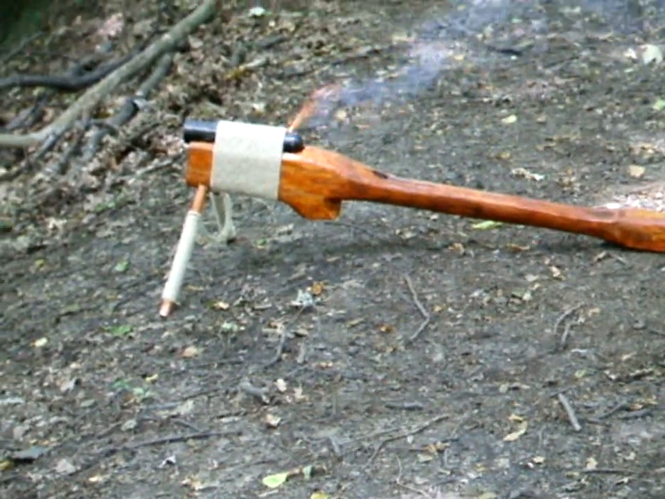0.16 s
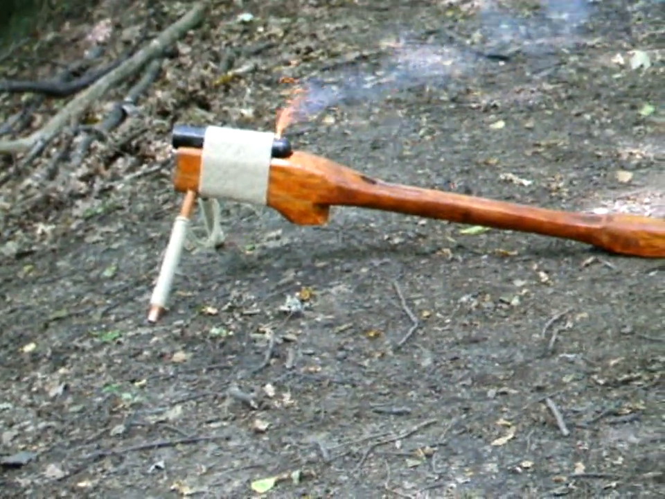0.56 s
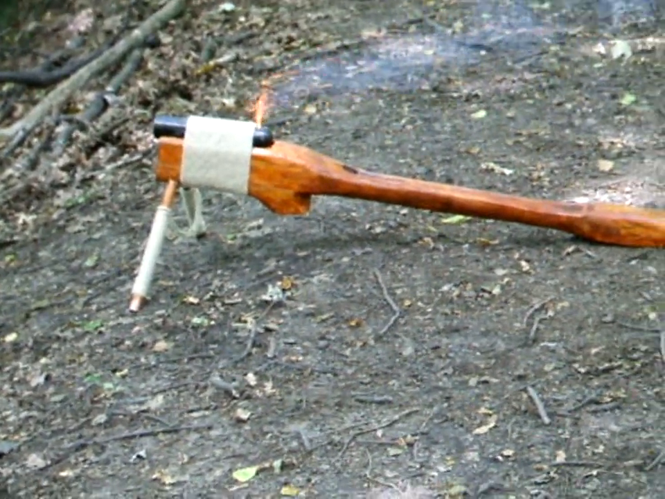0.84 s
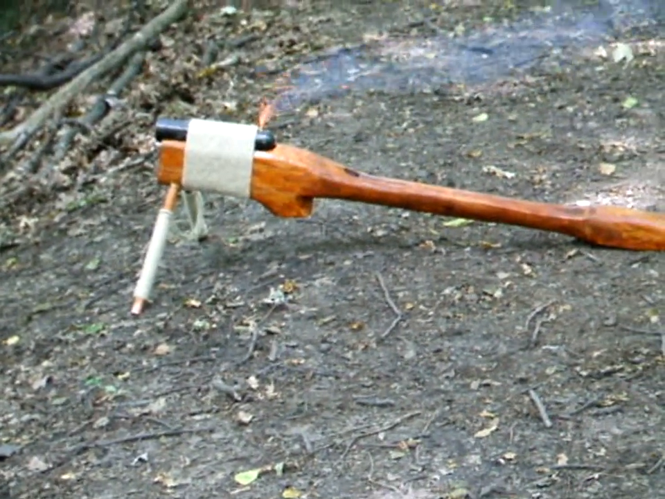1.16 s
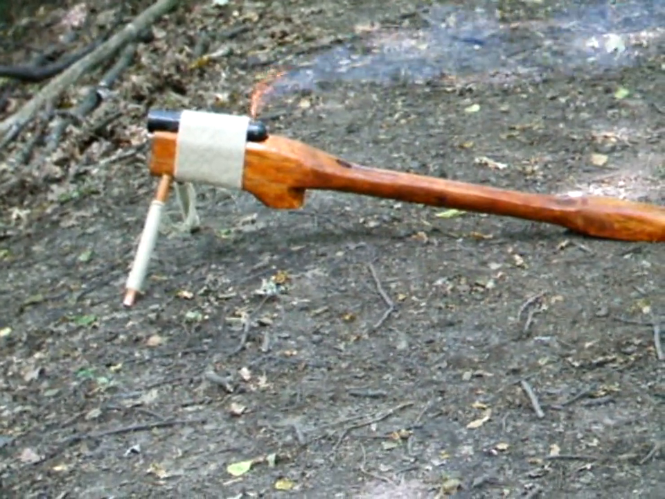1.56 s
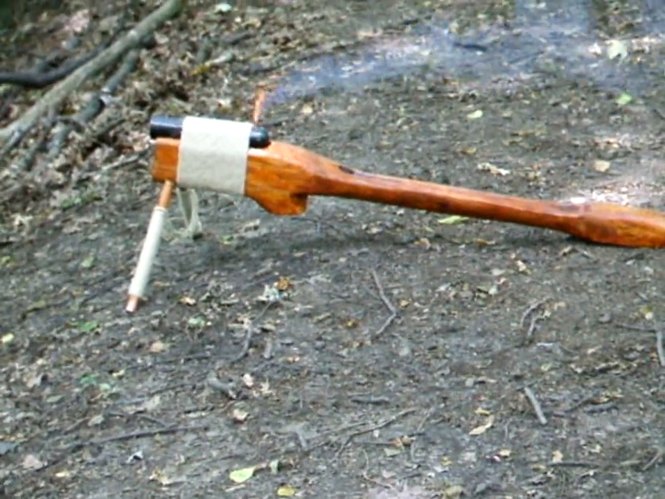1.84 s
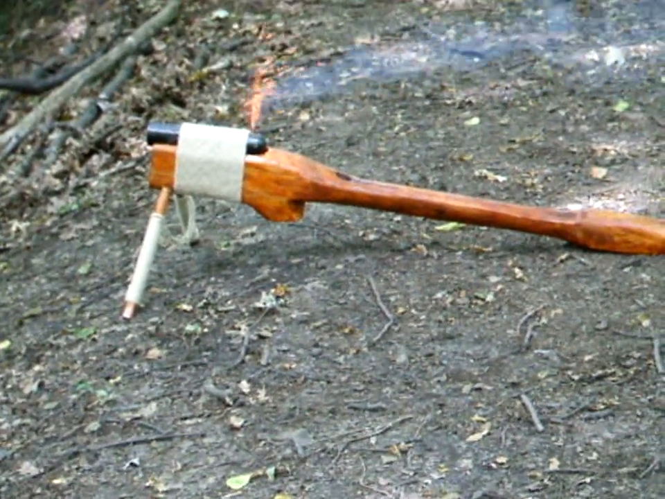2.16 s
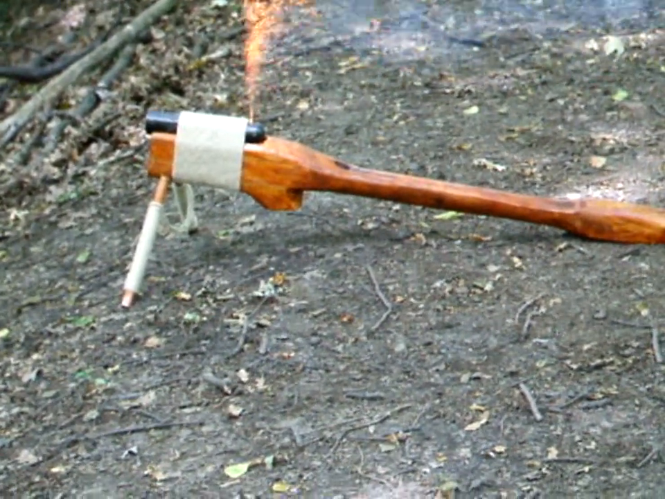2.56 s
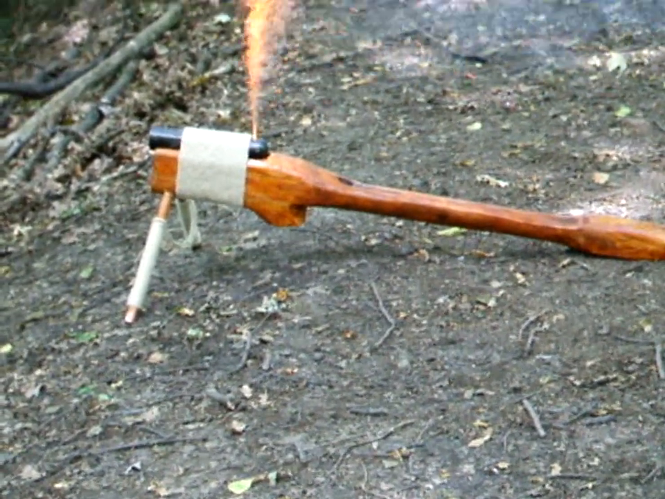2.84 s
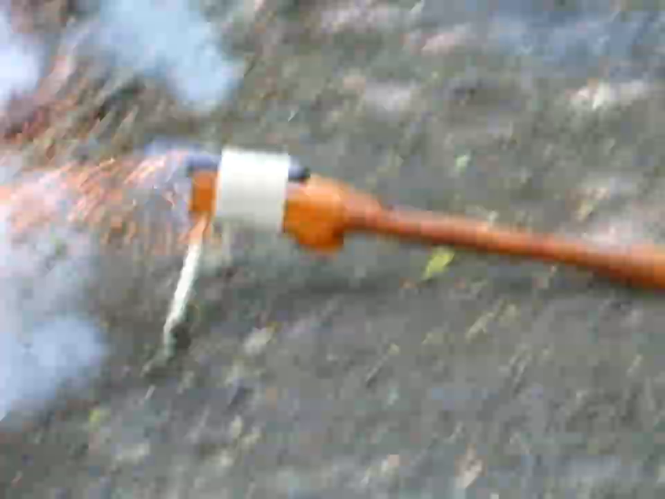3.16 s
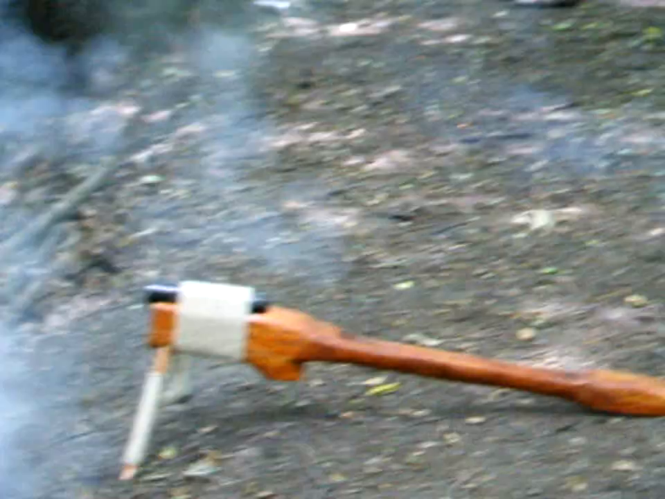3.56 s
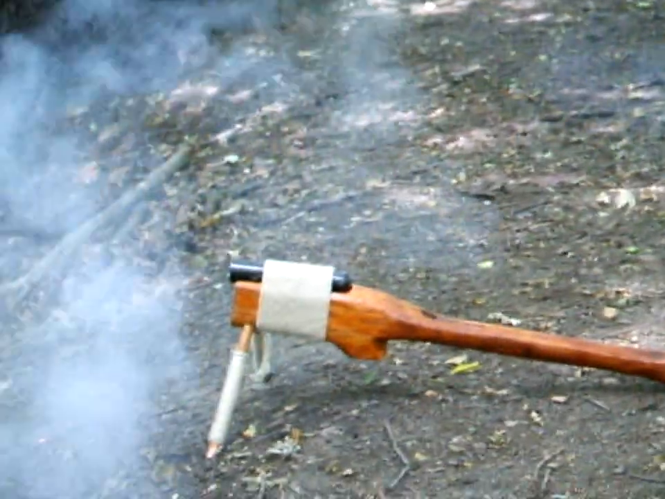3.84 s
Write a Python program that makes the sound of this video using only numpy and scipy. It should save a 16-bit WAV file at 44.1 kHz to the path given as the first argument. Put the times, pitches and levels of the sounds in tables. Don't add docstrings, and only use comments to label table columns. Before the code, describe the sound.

A small cannon's fuse fizzes thinly and unevenly over soft forest air. At 0.6-1.1 s leaves crunch and twigs snap, the sharpest near 1.03 s, with faint bird chirps until 1.8 s. From 2.4 s the hiss surges into a sputtering, roaring jet. At 3.23 s a hard-clipped blast cuts it off; a low boom dies, the level dips, then the noisy tree echo swells and dulls until 4 s.

```python
import sys
import numpy as np
from scipy import signal
from scipy.fft import rfft, irfft
from scipy.io import wavfile
from scipy.ndimage import uniform_filter1d

SR = 44100
rng = np.random.default_rng(int(sys.argv[2]) if len(sys.argv) > 2 else 0)


def volts(x):
    e = np.asarray(x, float) / 20
    return 10 ** e


def dump(signal):
    limited = np.clip(np.atleast_2d(signal).T, -1, 1)
    pcm = np.round(limited * 32767).astype(np.int16)
    wavfile.write(sys.argv[1], SR, pcm)


N = 176400
T = np.arange(N) / SR
SHOT_S = 3.2252
QUIET_DB = -36.5

# (time [s], level [dB])
BURN_LEVEL = [(0.0, -33), (0.25, -36.5), (0.27, -29.5), (0.65, -33), (0.96, -31), (1.03, -27.5),
              (1.09, -34.5), (2.41, -34), (2.66, -25), (2.92, -21), (2.93, -19), (3.04, -19), (3.07, -18.5),
              (3.1, -18.5), (3.12, -17.5), (3.14, -17), (3.19, -18.5), (3.22, -19.5)]
# (frequency [Hz], density [dB per Hz])
JET_COLOUR = [(90, -41), (200, -1.5), (460, -16.5), (640, 5), (950, -2.5), (2060, -1.5), (3400, -3.5),
              (16000, -6.5)]
# (time [s], width [s], boost [dB])
JET_SPURTS = [(.28, 0.04, -1), (.84, 0.042, 2), (2.65, .008, 1), (2.85, 0.019, 4), (2.939, 0.036, 2.5),
              (2.994, 0.0089, 3.5), (3.055, 0.0069, 1.5), (3.075, 0.014, 2), (3.123, 0.0077, 2.5),
              (3.162, 0.0028, 2.5), (3.194, 0.017, 3), (3.084, 0.0022, -4), (3.22, 0.0062, -1.5)]
# (frequency [Hz], density [dB per Hz])
AIR_COLOUR = [(10, -20), (30, 1.5), (60, -9), (250, -5.5), (420, -5.5), (620, -2), (1500, -2.5),
              (3000, -8.5)]
# (time [s], width [s], level [dB], pitch [Hz])
LEAF_CRUNCHES = [
    (.645, .03, -40, 1200),
    (.712, .02, -33, 1000),
    (.745, .02, -36, 800),
    (.88, .06, -44, 700),
    (.985, .03, -36, 1050),
    (1.035, .03, -40, 2500),
    (1.37, .02, -45, 2000),
]
# (time [s], peak [dB], pitch [Hz], decay to -60 dB [s])
TWIG_SNAPS = [
    (.6955, -23, 660, .03),
    (.7045, -24, 3800, .025),
    (.7095, -22, 1220, .04),
    (.7145, -24, 1100, .03),
    (.7352, -15, 780, .022),
    (1.0262, -9, 2050, .009),
    (1.0343, -17, 2300, .006),
    (1.0535, -24, 2900, .012),
    (1.468, -23, 1900, .015),
]
# (time [s], length [s], level [dB], pitch [Hz])
BIRD_CALLS = [
    (.85, .045, -45, 3300),
    (.88, .06, -40, 1060),
    (1.545, .07, -46, 4000),
    (1.74, .07, -47, 1320),
]
# (time [s], level [dB])
ECHO_LEVEL = [(3.23, -11.5), (3.236, -17.5), (3.28, -20), (3.308, -26.5), (3.536, -15), (3.898, -11.5),
              (4.0, -12)]
# (frequency [Hz], density [dB per Hz])
ECHO_START_COLOUR = [(30, -20), (100, 4.5), (300, -10.5), (700, -9), (2000, -11), (4000, -10),
                     (6000, -11.5), (8000, -15.5)]
# (frequency [Hz], fade [dB per s])
ECHO_FADE = [(30, 2), (120, 15.5), (350, -12.5), (1000, -1.5), (3000, 8.5), (6000, 23.5), (8000, 35.5)]
# (time after the shot [s], offset [full scale])
PREAMP_SWING = [(0, 0), (.0025, -.45), (.007, -1.05), (.016, -1.0), (.045, -.5), (.049, .2), (.063, .15),
                (.066, .72), (.08, .75), (.097, .04)]
# (frequency [Hz], gain [dB])
MIC_RESPONSE = [(20, 0), (6500, 0), (7750, -1), (8000, 2)]
# (frequency [Hz], gain [dB])
MIRROR_GAIN = [(8000, 0), (8800, -5.5), (10600, -16), (12300, -28.5), (13500, -47), (14500, -60),
               (16000, -62)]


def evened(x):
    return x / np.sqrt(np.mean(x ** 2) + 1e-20)


def read(points, hz):
    f, value = np.transpose(points)
    return np.interp(np.log(hz + 1), np.log(f + 1), value)


def noise():
    return rng.standard_normal(N)


def band_rms(x, lo_hz, hi_hz):
    z, hz = rfft(x), np.fft.rfftfreq(len(x), 1 / SR)
    band = z[(hz > lo_hz) & (hz < hi_hz)]
    return np.sqrt(2 * np.sum(abs(band) ** 2)) / len(x)


def slow(size):
    return evened(uniform_filter1d(uniform_filter1d(noise(), size), size))


def shaped(x, field, patch_db):
    hz, t, z = signal.stft(x, SR, nperseg=512, noverlap=384)
    patches = uniform_filter1d(rng.standard_normal(z.shape), size=6, axis=0)
    patches = evened(uniform_filter1d(patches, size=16, axis=1))
    gain = volts(field(hz[:, None], t[None]) + patch_db * patches)
    return signal.istft(z * gain, SR, nperseg=512, noverlap=384)[1][:N]


def resonate(x, hz, width):
    turn = np.exp(2j * np.pi * hz * np.arange(len(x)) / SR)
    r = np.exp(-np.pi * width / SR)
    return 2 * (turn * signal.lfilter([1 - r], [1, -r], x / turn)).real


def sparks(per_s, spread_db):
    size = volts(spread_db * np.minimum(rng.exponential(1, N), 4)) * rng.choice([-1., 1.], N)
    return evened(size * (rng.random(N) < per_s / SR))


def path_echo(x):
    delay_s, gain = .00057, .55
    z, hz = rfft(x), np.fft.rfftfreq(N, 1 / SR)
    bounce = gain / (1 + (hz / 9000) ** 2) * np.exp(-2j * np.pi * hz * delay_s)
    return irfft(z * (1 + bounce), N)


def bore_hum(over):
    hz, width_hz = 200, 120
    level_db = -85.5 + 2.5 * uniform_filter1d(over, size=4000)
    return volts(level_db) * evened(resonate(resonate(noise(), hz, width_hz), hz, width_hz))


def fuse():
    spark_share, roar_hz, roar_per_db = .35, 1770, 1.0358
    burn_db = np.interp(T, *np.transpose(BURN_LEVEL))
    spurt_db = sum(db * np.exp(-((T - s) / w) ** 2) for s, w, db in JET_SPURTS)
    over = np.maximum(burn_db - QUIET_DB, 0)
    drive = (1 - spark_share) * noise() + spark_share * sparks(per_s=4000, spread_db=3.0)
    strength = over ** 2 / 20 + spurt_db

    def colour(hz, t):
        roar = roar_per_db * (np.interp(t, T, strength) - 28.5) / (1 + (hz / roar_hz) ** 2)
        return read(JET_COLOUR, hz) + roar

    gas = path_echo(shaped(drive, colour, patch_db=1.5))
    flutter = evened(slow(size=90) + slow(size=400) + .7 * slow(size=1800))
    flicker_db = (1.2 + .025 * over) * flutter
    gas = gas / band_rms(gas, 3280, 8630) * volts(burn_db + spurt_db + flicker_db - 1.0)
    return (gas + bore_hum(over)) * (T < SHOT_S)


def woods():
    z, hz = rfft(noise()), np.fft.rfftfreq(N, 1 / SR)
    air = irfft(z * volts(read(AIR_COLOUR, hz) - 4.35 * np.log2(1 + hz / 2500)), N)
    air = shaped(air, lambda hz, t: 0 * hz * t, patch_db=0.69)
    level_db = -39.5 + 1.9 * np.exp(-((T - .45) / 0.89) ** 2)
    return volts(level_db) * evened(air) * (T < SHOT_S)


def leaves():
    out, grit = np.zeros(N), sparks(per_s=4000, spread_db=1.8)
    for s, w, db, hz in LEAF_CRUNCHES:
        crunch = sum(resonate(resonate(grit, hz * m, hz * 0.52), hz * m, hz * 0.67) for m in (.7, 1.3))
        out += volts(db) * evened(crunch) * np.exp(-((T - s) / w) ** 2)
    return out


def twigs():
    out, t = np.zeros(N), np.arange(2000) / SR
    for s, db, hz, t60 in TWIG_SNAPS:
        ring = np.zeros(len(t))
        for m, gain in [(1, .6), (1.6, .5), (2.4, .5)]:
            ring += gain * np.sin(2 * np.pi * hz * m * t) * volts(-60 * m * t / t60)
        out[round(s * SR):][:len(t)] += volts(db + 3) * ring * np.minimum(t * hz, 1)
    return out


def birds():
    out = np.zeros(N)
    for s, length, db, hz in BIRD_CALLS:
        u = np.clip((T - s) / length, 0, 1)
        out += volts(db) * np.sin(np.pi * u) * np.sin(2 * np.pi * hz * (T + 0.011 * length * u ** 2))
    return out


def crack(u):
    hz, width_hz, level_db, t60 = 2200, 3000, -9, .035
    burst = evened(resonate(resonate(noise(), hz, width_hz), hz, width_hz))
    return volts(level_db - 60 * u / t60) * np.minimum(u / .0008, 1) * burst


def thud(u):
    rise = u / .09
    return volts(-19) * rise * np.exp(1 - rise) * evened(resonate(noise(), hz=95, width=50))


def wobble(u):
    boom = evened(resonate(noise(), hz=200, width=115))
    return volts(-10.5 - 60 * u / 0.32) * boom * np.minimum(u / .015, 1)


def tree_echo():
    slaps_per_s, slap_db = 100, 0.5

    def colour(hz, t):
        return read(ECHO_START_COLOUR, hz) - read(ECHO_FADE, hz) * np.maximum(t - SHOT_S, 0)

    echo = shaped(noise(), colour, patch_db=0.5)
    body = resonate(echo, hz=1205, width=2250)
    echo = echo / np.sqrt(uniform_filter1d(body ** 2, size=9000))
    slaps = slap_db * slow(size=int(SR / slaps_per_s / 3))
    return volts(np.interp(T, *np.transpose(ECHO_LEVEL)) + slaps + 1.0) * echo


def shot():
    u = np.maximum(T - SHOT_S, 0)
    return (crack(u) + thud(u) + tree_echo() + wobble(u)) * (T >= SHOT_S)


def scene():
    return (fuse() + woods() + leaves() + twigs() + birds() + shot())[None]


def overloaded(dry):
    u, offset, clip = T - SHOT_S, -.0068, .96
    swing = uniform_filter1d(np.interp(u, *np.transpose(PREAMP_SWING)), size=60)
    swing = swing * np.clip((.7 - u) / .2, 0, 1)
    return np.clip(dry + swing + offset, -clip, clip)


def low_rate(x):
    half_hz, leak_db = 8000, -43
    hz = np.fft.rfftfreq(N, 1 / SR)
    z = rfft(x, axis=1) * volts(read(MIC_RESPONSE, hz))
    half = round(half_hz * N / SR)
    silent = np.zeros((1, len(hz) - 2 * half))
    mirrored = np.concatenate([z[:, :half], np.conj(z[:, half:0:-1]), silent], axis=1)
    leak = volts(leak_db) * np.roll(z, half, axis=1) * (hz > 12500) * (hz < 2 * half_hz)
    return irfft(mirrored * volts(read(MIRROR_GAIN, hz)) + leak, N, axis=1)


def top_cut(x):
    return signal.sosfilt(signal.butter(12, 15730, fs=SR, output="sos"), x)


def record(dry):
    mix = np.clip(low_rate(overloaded(dry)), -1, 1)
    return top_cut(mix)


dry = scene()
out = record(dry)
dump(out)
```